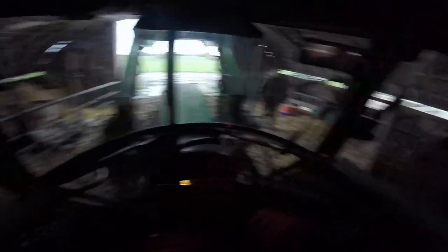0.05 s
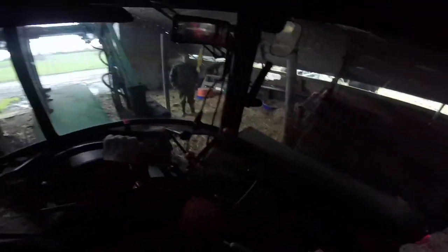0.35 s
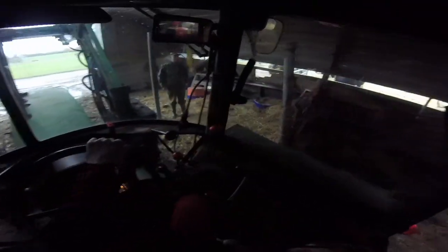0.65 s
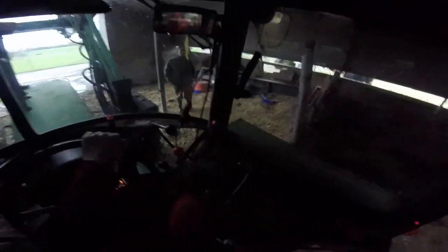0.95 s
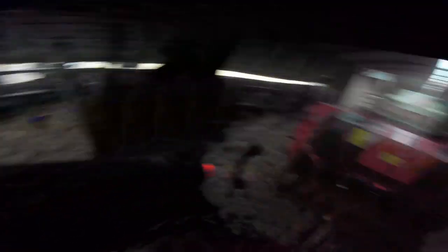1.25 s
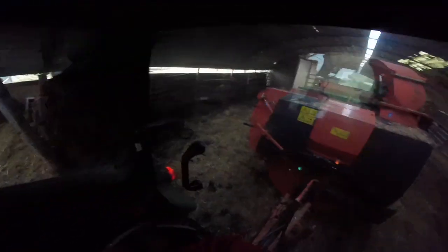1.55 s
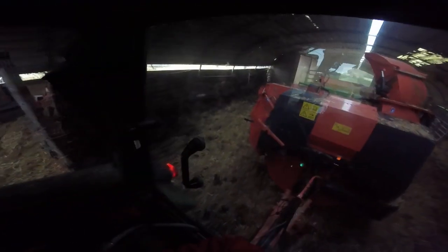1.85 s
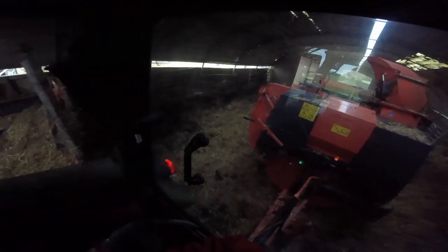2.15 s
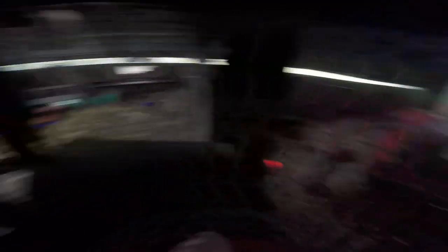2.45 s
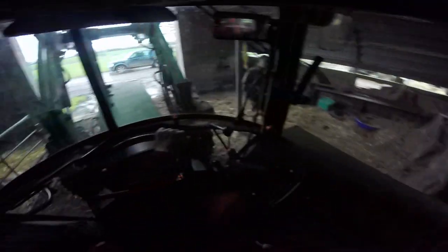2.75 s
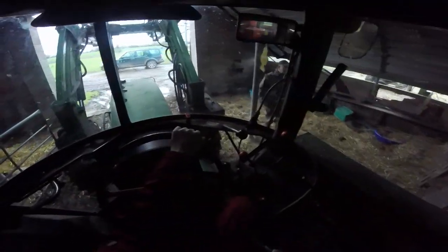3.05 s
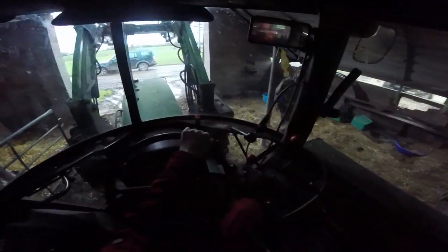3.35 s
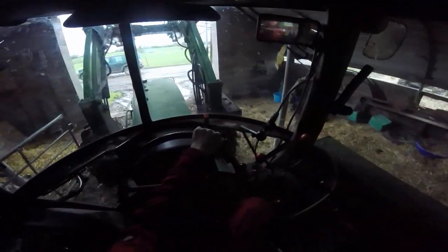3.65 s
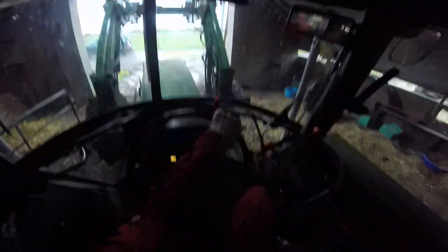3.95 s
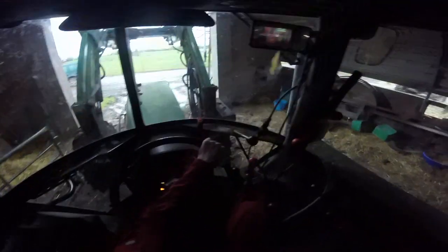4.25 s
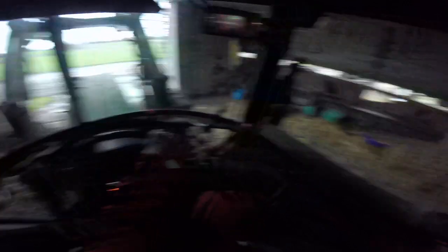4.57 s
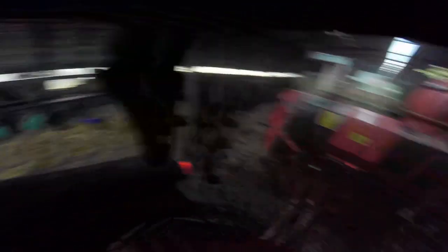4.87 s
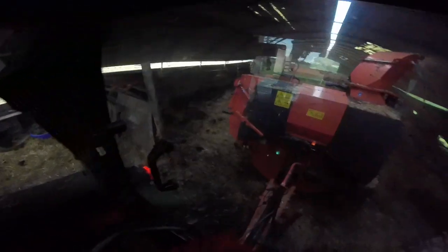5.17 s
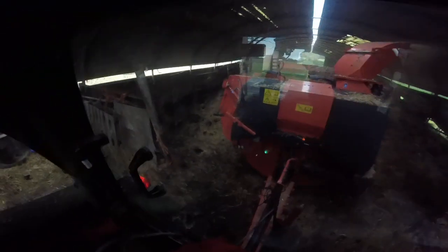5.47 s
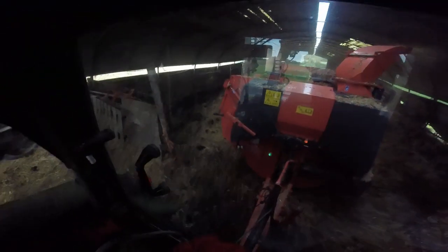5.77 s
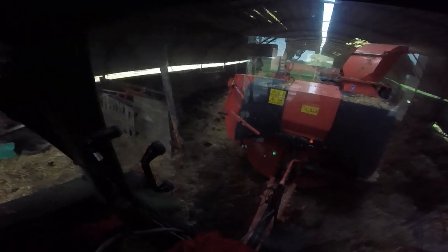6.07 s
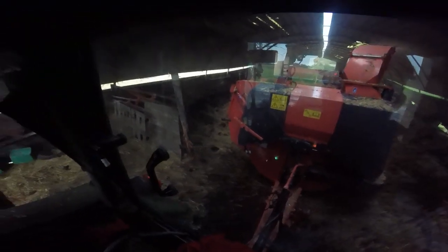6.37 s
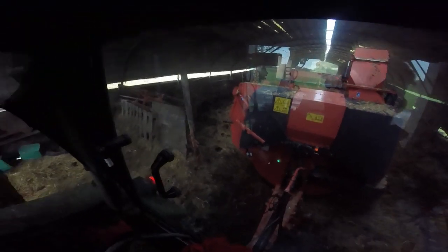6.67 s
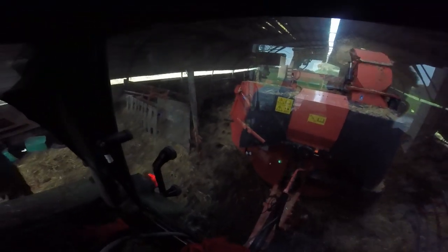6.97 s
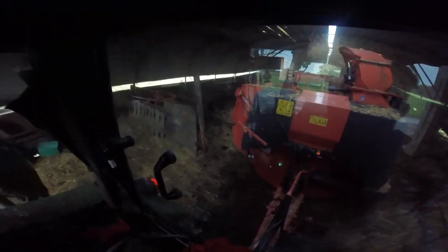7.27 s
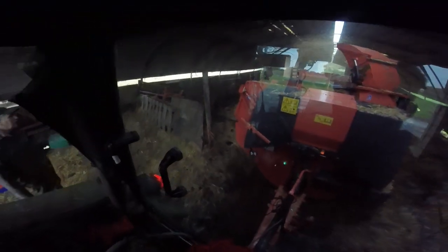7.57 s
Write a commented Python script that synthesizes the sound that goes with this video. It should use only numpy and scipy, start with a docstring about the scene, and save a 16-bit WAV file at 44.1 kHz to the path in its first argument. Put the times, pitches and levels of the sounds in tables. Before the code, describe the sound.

From the cab, a tractor engine hums and clatters steadily under a straw chopper's droning blower, the tone shifting as the microphone turns.

```python
"""A four-cylinder tractor diesel driving a straw chopper at steady speed, heard from the cab, in a shed.
The engine's 4th order beats six times a second against the blade drone of the chopper's blower.
Combustion clatters, gears whine, a thin whistle sits on top, and blown air and straw hiss.
The microphone turns with the driver's head through the cab's standing waves, between windscreen
(front, head = 0) and rear window (back, head = 1), so the balance shifts with every turn."""
import sys
import numpy as np
from scipy import signal
from scipy.fft import rfft, irfft, next_fast_len
from scipy.io import wavfile

SR = 44100
rng = np.random.default_rng(int(sys.argv[2]) if len(sys.argv) > 2 else 0)


def store_pcm(level_fs):
    """Save levels as 16-bit WAV."""
    pcm = np.round(np.clip(level_fs, -1, 1) * 32767).astype(np.int16)
    wavfile.write(sys.argv[1], SR, np.atleast_2d(pcm).T)


N = 336042
TIME = np.arange(N) / SR

# Governed crankshaft speed, sagging a little under the straw: time_s, turns_per_s
CRANK_SPEED = [(0, 35.355), (4.3, 35.355), (5.7, 35.327), (6.2, 35.27), (6.7, 35.315)]
# Strongest engine tones, from low booms to high whines: cycles_per_turn, front_db, side_db, back_db
STRONG_ORDERS = [(1, -14.8, -14.3, -14.8), (2, -33, -32, -33), (3, -37, -30, -29.5), (3.5, -27, -28, -28),
                 (4, -24.5, -18, -18.7), (5.5, -37.5, -35, -32.5), (6, -25.3, -23.5, -33),
                 (7, -43, -33, -32), (7.5, -41, -32, -33), (12, -32.5, -40, -40), (16, -27.3, -36, -40),
                 (20, -46, -41, -43.5), (40, -46.5, -55, -59), (48, -45.5, -51, -54), (56, -40.5, -49, -54)]
# Spectral shape of the engine and blower roar: frequency_hz, front_db, back_db
ROAR_SPECTRUM = [(12, -54, -53), (20, -44, -43), (40, -42.5, -42.5), (82, -51.5, -55), (104, -47.5, -40.5),
                 (142, -45.5, -45), (181, -52, -51), (226, -52, -49.5), (260, -61, -52), (350, -64, -53),
                 (478, -53.5, -59), (661, -54, -55.5), (728, -64, -65.5), (972, -65.5, -67.5)]
# Spectral shape of the combustion clatter: frequency_hz, front_db, back_db
CLATTER_SPECTRUM = [(1075, -69.5, -73), (1440, -68, -69.5), (1740, -66, -68), (1990, -61.5, -62),
                    (2050, -64, -63), (2530, -72, -73), (3360, -71.5, -73), (3990, -81.5, -80),
                    (4420, -76.5, -80), (4670, -86.5, -80.5)]


def engine_tones(crank, head, sway_db=1.15, sway_per_s=5):
    """The engine orders that stand out in the cab, each swaying a little with the load."""
    out = np.zeros(N)
    for order, *levels_db in STRONG_ORDERS:
        phase = 0 if order == 4 else rng.random()  # the 4th order keeps time with the beat
        out += facing(levels_db, head) * amp(sway_db * drift(sway_per_s)) * tone(order * crank + phase)
    return out


def engine_hum(crank, head, firing_db=1.5, half_order_db=-2.5, scatter_db=2, sway=0.28):
    """Unequal cylinders repeat every two turns, giving whole and half orders; the firing orders lead."""
    # Base level of the weaker orders: pitch_hz, front_db, back_db
    hum_spectrum = [(50, -46, -49), (146.5, -26.5, -39), (178, -46.5, -37), (276, -47, -43),
                    (324.5, -36.5, -38.5), (398, -47, -50), (452, -40.5, -41), (673, -47.5, -51),
                    (974, -56, -58), (1230, -52, -52.5), (1630, -60, -57), (2180, -53, -53.5),
                    (2290, -54, -55.5)]
    out = np.zeros(N)
    for order in np.setdiff1d(np.arange(2, 128) / 2, np.array(STRONG_ORDERS)[:, 0]):
        hz = order * np.mean(np.array(CRANK_SPEED)[:, 1])
        accent_db = firing_db * (order % 2 == 0) + half_order_db * (order % 1 > 0)
        front, back = (amp(db + accent_db + scatter_db * rng.standard_normal())
                       for db in front_back_db(hum_spectrum, hz))
        phase = rng.random() + head * rng.uniform(-0.45, 0.36)  # shifts as the microphone moves
        out += (front + (back - front) * head) * (1 + sway * drift(8.2)) * tone(order * crank + phase)
    return out


def engine_knock(crank, head, boost_db=5, low_hz=1100, top_hz=2800, size=2 ** 13, places=4):
    """The clatter that repeats with each four-stroke cycle: a dense comb of weak half orders."""
    hz = np.arange(size // 2 + 1) * np.mean(np.array(CRANK_SPEED)[:, 1]) / 2
    front_db, _ = front_back_db(ROAR_SPECTRUM + CLATTER_SPECTRUM[1:], hz)
    band = hz / np.hypot(hz, low_hz) / (1 + (hz / top_hz) ** 6)
    gain = amp(front_db + boost_db) * band
    gain[np.round(2 * np.array(STRONG_ORDERS)[:, 0]).astype(int)] = 0  # gaps for the strong orders
    out = np.zeros(N)
    for place in range(places):  # each microphone position in the cab favours other lines
        real, imaginary = rng.standard_normal((2, len(hz)))
        cycle = irfft(gain * (real + 1j * imaginary)) * size / 2
        nearness = np.sqrt(np.maximum(1 - abs(head * (places - 1) - place), 0))
        out += nearness * np.interp(crank / 2 % 1 * size, np.arange(size), cycle)
    return out


def blower(crank, head, blades_per_turn=4.173, flutter_db=3.4, waver_db=3.5, echo_db=-30.5):
    """The chopper's blades, geared to the engine and loaded unevenly by the straw, drone into the shed."""
    # Weaker blade tones: multiple_of_drone, front_db, back_db
    blade_tones = [(.5, -34.5, -39), (1.5, -30.5, -36), (2, -32.5, -47), (2.5, -46, -48), (3, -42, -46)]
    phase = blades_per_turn * crank + 0.0073 * drift(4)
    phase -= 0.562 * (1 - head)  # the drone arrives later at the front of the cab
    out = facing((-35.5, -25.5, -19), head) * amp(flutter_db * drift(20)) * tone(phase)
    shed_echo = sum(drift(5) * tone(phase + shift) for shift in (0, 0.25))  # level and phase wander
    out += amp(echo_db) * unit(shed_echo)
    for multiple, front_db, back_db in blade_tones:
        level_db = front_db + (back_db - front_db) * head + waver_db * drift(6)
        out += amp(level_db) * tone(multiple * phase + rng.random() + 0.12 * drift(6.5))
    return out


def roar(crank, head, level_db=-1.0):
    """Low noise of engine and blower filling the cab, throbbing with the firings."""
    return cab_noise(ROAR_SPECTRUM, head) * firing_pulse(crank, depth=0.18, uneven=0.091) * amp(level_db)


def clatter(crank, head, sway_db=0.76):
    """The random part of the combustion clatter, pulsing lightly with the firings."""
    noise = cab_noise(CLATTER_SPECTRUM, head)
    return noise * firing_pulse(crank, depth=0.039, uneven=0.053) * amp(sway_db * drift(10))


def gears(head):
    """Transmission in front, chopper drive behind: each whine is noise passed twice through a resonance."""
    # Gear resonances: pitch_hz, half_width_hz, front_db, back_db
    whines = [(818, 4.7, -43.5, -44.5), (971, 7, -53.5, -47.5), (1475, 11, -62, -44), (1613, 22, -55, -46),
              (1722, 14, -50, -62), (1990, 11, -45, -71), (2700, 22, -54, -54), (3005, 10, -55.5, -62),
              (3534, 24, -51.5, -71), (3646, 25, -59, -67), (3916, 12, -66, -59)]
    out = np.zeros(N)
    for hz, half_width_hz, front_db, back_db in whines:
        ring = signal.iirpeak(hz, hz / (2 * half_width_hz), fs=SR)
        whine = signal.lfilter(*ring, signal.lfilter(*ring, rng.standard_normal(N)))
        out += amp(front_db + (back_db - front_db) * head) * unit(whine)
    return out


def whistle(head, pitch_hz=4297, wander_hz=16, front_db=-51.5, shade_db=-8.5, beam_width=0.12):
    """A thin whistle, perhaps the turbocharger: a little unsteady in pitch, clearest straight ahead."""
    level_db = front_db + shade_db * np.minimum(head / beam_width, 1)
    return amp(level_db) * tone(np.cumsum(pitch_hz + wander_hz * drift(60)) / SR)


def straw_hiss(crank, head, flicker_db=0.5):
    """Blown air and straw: a faint, flickering hiss above the machinery."""
    # Spectral shape of the hiss: frequency_hz, front_db, back_db
    hiss_spectrum = [(4840, -80.5, -81.5), (5300, -82.5, -81.5), (6630, -84.5, -83), (7340, -90, -88.5),
                     (8230, -89, -88.5), (9900, -100, -97), (11000, -94.5, -95.5), (13500, -105, -105),
                     (15000, -113, -112)]
    noise = cab_noise(hiss_spectrum, head)
    return noise * firing_pulse(crank, depth=0.025, uneven=0.027) * amp(flicker_db * drift(18))


def firing_pulse(crank, depth, uneven):
    """Gain through the cycle: a swell at each of two firings a turn, some cylinders harder than others."""
    imbalance = tone(crank / 2 + rng.random()) + tone(crank + rng.random())
    return unit(1 + depth * tone(2 * crank) + uneven * imbalance)


def cab_noise(spectrum, head):
    """Noise over the span of a spectrum, its colour following the microphone's turn."""
    size = next_fast_len(N, real=True)
    hz = np.fft.rfftfreq(size, 1 / SR)
    band = 1 / np.sqrt((1 + (spectrum[0][0] / (hz + 1)) ** 20) * (1 + (hz / spectrum[-1][0]) ** 20))
    noise_bins = rfft(rng.standard_normal(size)) * np.sqrt(SR / 2) * band
    front, back = (irfft(noise_bins * amp(db), size)[:N] for db in front_back_db(spectrum, hz))
    return (1 - head) * front + head * back


def facing(levels_db, head, side_window=0.81):
    """Gain at the microphone as it passes from windscreen to side window to rear window."""
    return np.interp(head, [0, side_window, 1], amp(levels_db))


def front_back_db(spectrum, hz):
    """A spectrum's front and back levels, read on a log-frequency axis."""
    points_hz, *columns_db = np.array(spectrum).T
    return [np.interp(np.log(hz + 1), np.log(points_hz + 1), db) for db in columns_db]


def amp(db):
    """Decibels to gain."""
    return 10 ** (np.asarray(db) / 20)


def unit(x):
    """Scales to rms 1."""
    return x / np.sqrt(np.mean(x ** 2) + 1e-20)


def curve(rows):
    """A time table's value at every sample."""
    return np.interp(TIME, *np.array(rows).T)


def drift(per_s):
    """A random wander of roughly rms 1."""
    points = rng.standard_normal(2 ** 10)
    return np.interp(TIME * per_s, np.arange(len(points)), points)


def tone(cycles):
    """A sine of rms 1."""
    return 2 ** .5 * np.sin(2 * np.pi * cycles)


def scene(beat_s=5.53):
    """Engine and blower run off one crankshaft, heard from the driver's seat."""
    # Microphone direction: time_s, head_turn (0 facing the windscreen, 1 facing the chopper)
    head_turns = [(0, 0.13), (1.12, 0.082), (1.45, 0.7), (2.3, 0.89), (2.7, 0.31), (3.1, 0.046),
                  (4.7, 0.0058), (4.87, 0.73), (5.05, 1), (7.6, 1)]
    head = curve(head_turns)
    crank = np.cumsum(curve(CRANK_SPEED)) / SR  # angle in turns
    crank -= np.interp(beat_s, TIME, crank)  # blower drone and 4th order swell together at beat_s
    engine = engine_tones(crank, head) + engine_hum(crank, head) + engine_knock(crank, head)
    tones = engine + blower(crank, head) + gears(head) + whistle(head)
    noise = roar(crank, head) + clatter(crank, head) + straw_hiss(crank, head)
    return (tones + noise)[None]


def record(dry, top_hz=15100):
    """One microphone at the driver's head, its treble cut steeply at the top of the band."""
    lowpass = signal.firwin(511, top_hz, window=("kaiser", 9), fs=SR)
    return signal.oaconvolve(dry, lowpass[None], "same")


dry = scene()
out = record(dry)
store_pcm(out)
```